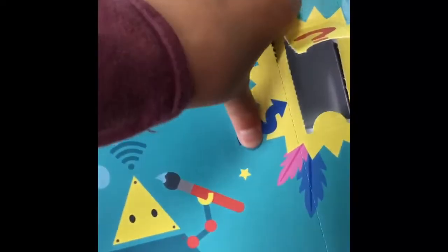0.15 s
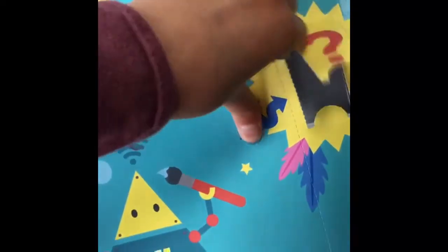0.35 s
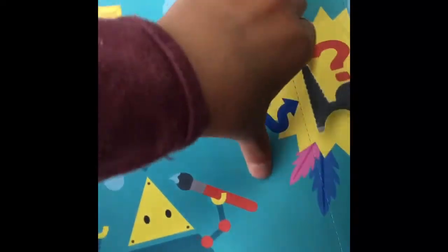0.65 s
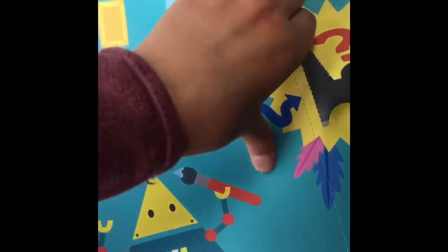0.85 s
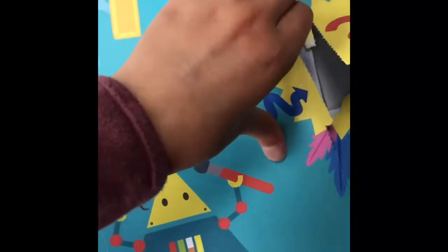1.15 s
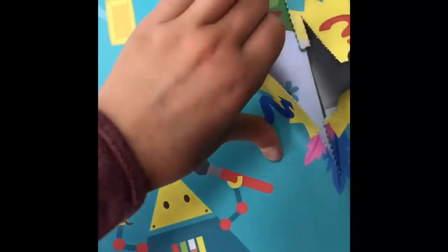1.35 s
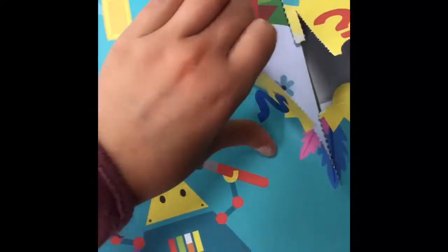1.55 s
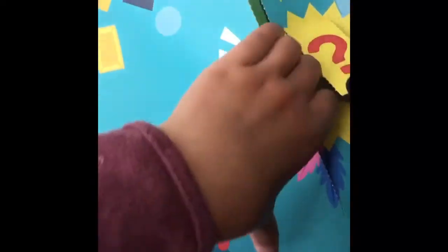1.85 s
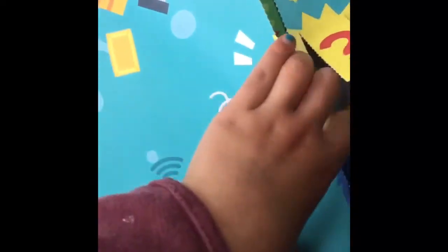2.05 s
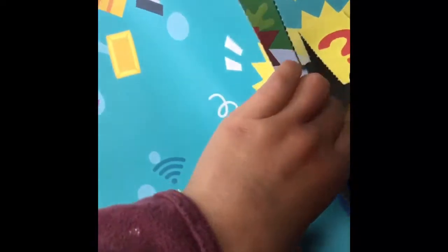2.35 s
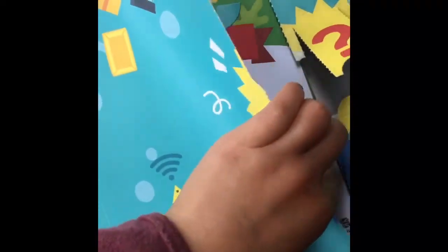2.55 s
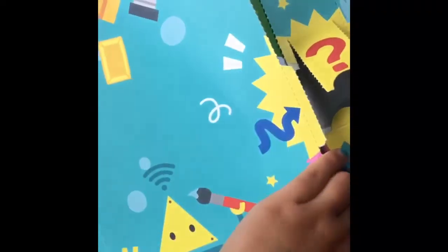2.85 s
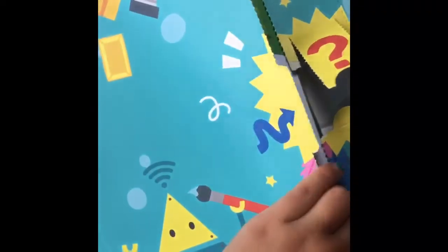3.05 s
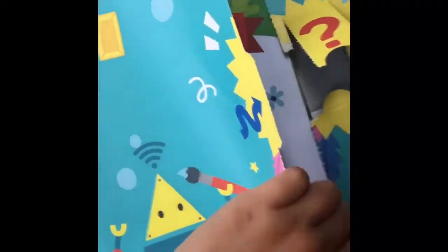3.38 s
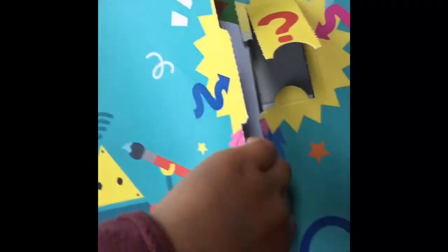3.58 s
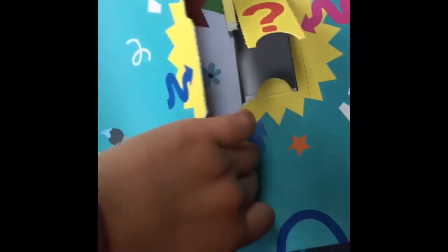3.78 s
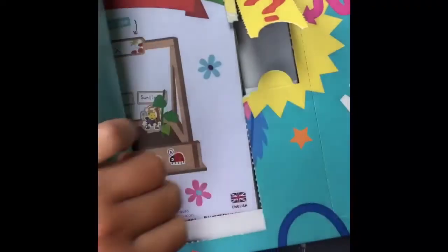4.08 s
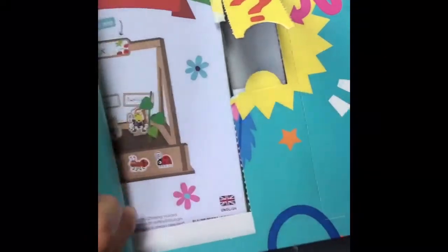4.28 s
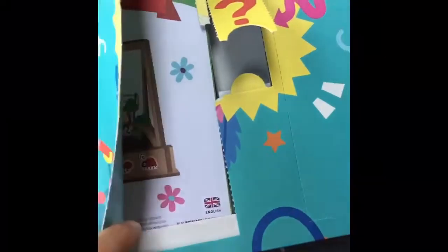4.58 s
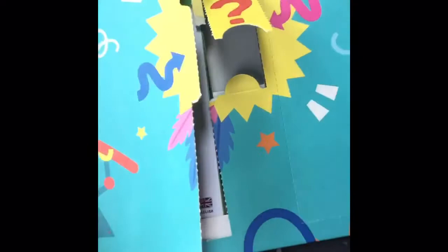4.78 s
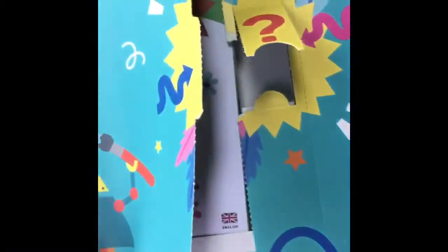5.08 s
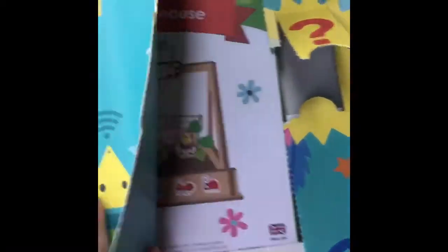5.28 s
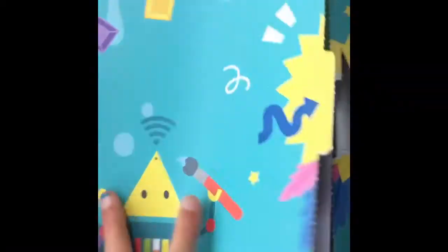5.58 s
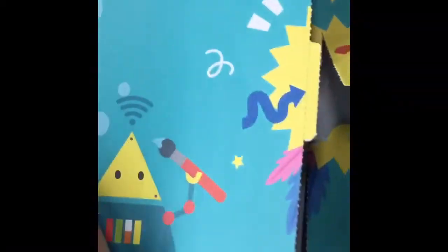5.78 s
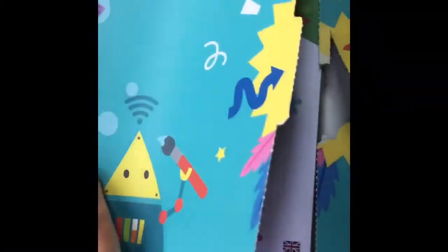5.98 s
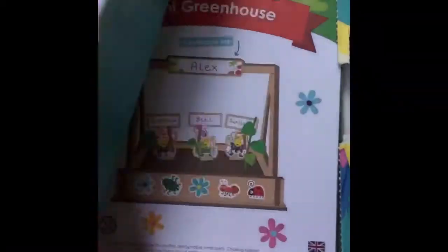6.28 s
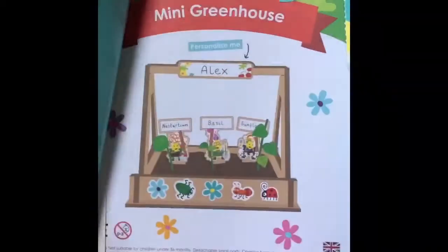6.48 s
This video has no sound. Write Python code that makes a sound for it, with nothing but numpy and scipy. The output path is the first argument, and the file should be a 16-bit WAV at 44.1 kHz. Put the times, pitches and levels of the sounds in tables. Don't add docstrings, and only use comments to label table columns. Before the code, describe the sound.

Very close, a hand tears the lid of a thin hollow cardboard box along its perforation. Sharp clusters of dry snaps and raspy fibre crackle come in uneven bursts, separated by near-silent gaps with faint finger rustling. Harder tugs add light boxy knocks. Later the pulls turn to scuffs and creases, ending with a dense crackle and soft flexing boom as the lid lifts. Small furnished room, short tail, thin phone microphone with little bass and a quiet background.

```python
import sys
import numpy as np
from scipy import signal
from scipy.io import wavfile
from scipy.ndimage import uniform_filter1d

SR = 44100
rng = np.random.default_rng(int(sys.argv[2]) if len(sys.argv) > 2 else 0)


def voltage_ratio(level):
    return 10 ** (np.asarray(level, float) / 20)


def digitize_waveform(pressure):
    field = np.atleast_2d(pressure).T
    bounded = np.clip(field, -1, 1)
    quanta = np.round(bounded * 32767).astype(np.int16)
    wavfile.write(sys.argv[1], SR, quanta)


N = 292383

# pitch_hz, width_hz, level_db
BOX_MODES = [
    (193, 76, -3),
    (282, 14, 2.5),
    (344, 57, -2.5),
    (481.6, 20, 2),
    (536, 25, 2),
    (670, 74, 1.5),
]


def rms_one(x):
    return x / np.sqrt(np.mean(x ** 2) + 1e-20)


def cut(x, hz, kind, order=2):
    sos = signal.butter(order, np.clip(hz, 20, .45 * SR), kind, fs=SR, output="sos")
    return signal.sosfilt(sos, x)


def resonate(x, hz, width_hz):
    r = np.exp(-np.pi * width_hz / SR)
    poles = [1, -2 * r * np.cos(2 * np.pi * hz / SR), r * r]
    return signal.lfilter([(1 - r * r) / 2, 0, (r * r - 1) / 2], poles, x)


def body(x, modes):
    return sum((-1) ** k * voltage_ratio(db) * resonate(x, hz, width_hz) for k, (hz, width_hz, db) in enumerate(modes))


def drift(rate_hz):
    r = np.exp(-2 * np.pi * rate_hz / SR)
    noise = rng.standard_normal(N + 9000)
    return rms_one(signal.lfilter([1], [1, -2 * r, r * r], noise)[9000:])


def snaps(strain_s=0.0021, strain_db=-26, after_s=0.0058, after_db=-17, rise=0.27, fall=0.48, spikiness=1.3,
          sharpness=7.3, broad_db=-13.0, crack_db=-6.5, ring_in_room=.3, broad_in_room_db=5):
    # start_s, peak_db,
    # flap_ring_hz, crack_re_peak_db, length_ms
    breaks = [(0.0546, -37.5, 3060, 5, 2.1), (0.0635, -8.5, 2664, 2, 2.2),
              (0.1688, -18, 3060, 5, 2.2), (0.2275, -29, 4010, 2, 2.5), (0.2352, 4.5, 1524, -6, 4.4),
              (0.259, 0, 2840, 2, 2.9), (0.2635, -3.5, 5340, -5, 1.6), (0.2712, -13.5, 3920, 10, 1.6),
              (0.2751, -19.5, 5870, -2, 1.2), (0.292, -10.5, 5440, 1, 1.1),
              (0.2982, -13.5, 5400, -6, 1.4), (0.4096, -12.5, 5430, -4, 2.5),
              (0.5726, -37.5, 1440, -18, 10), (0.6106, -34.5, 2000, 0, 12.0),
              (0.6491, -44, 1680, 8, 1.7), (0.6672, -37, 900, -14, 1.1),
              (0.7709, -49.5, 1350, -29, 2.1), (0.8961, -52.5, 4140, 8, 4.5),
              (0.9659, -10, 3680, 2.5, 4.4), (0.9884, -20, 2280, 6.5, 2.4), (0.994, -4, 5450, 1, 1.0),
              (0.998, -1.5, 3080, 9, 2.6), (1.0135, -1.5, 3760, 3.5, 0.8),
              (1.0314, -3.5, 3500, 1.5, 1.5), (1.1022, -30.5, 1360, -15, 2.4),
              (1.1256, -33, 3850, -4.5, 2.6), (1.2092, -36, 3460, 3, 1.1),
              (1.213, -5, 2820, 4.5, 2.3), (1.3102, -27.5, 1000, -23.5, 1.5),
              (1.3183, -7.5, 1230, -2, 0.79), (1.3241, -8.5, 1190, 10, 4.2),
              (1.349, -3.5, 6200, 7, 0.8), (1.4145, -28.5, 5430, 12.5, 1.5),
              (1.4735, -20, 2890, 11.5, 2.7), (1.4848, -30, 5940, 14, 1.4),
              (1.4934, -29.5, 5360, 10, 2.4), (1.5487, -18.5, 1980, -12, 2.2),
              (1.5555, -28, 2950, -2, 1.8), (1.5649, -10, 2700, -1.5, 3.5), (1.605, -34, 2240, 13, 1),
              (1.6947, -18, 6120, -7, 3.4), (1.7085, -14.5, 3440, 2.5, 3.5),
                    (1.7282, -22, 2030, -4, 2.3), (1.7376, 1.5, 1480, -15, 3.1),
                    (1.7515, -11, 1400, -20, 1.9), (1.7576, -20, 1340, -6, 2.1),
                    (1.9193, -31, 1230, -18, 2.3), (1.9663, -38, 4330, 2, 2.4),
                    (1.9946, -35, 1330, -18, 2.4), (2.0248, -31, 2430, -4.5, 5.5),
                    (2.0697, -30, 2370, 2, 3.1), (2.0818, -20, 3900, -9, 1.8), (2.089, -22, 1910, -9, 1.6),
                    (2.1015, -22, 1870, -9, 1.6), (2.1206, -21, 1940, -4, 1.8),
                    (2.149, -18.5, 1840, -8, 1.5), (2.176, -24.5, 1920, -8, 1.4),
                    (2.1985, -6, 2630, -1.5, 4.7), (2.2286, -14, 2480, 2.5, 2.9),
                    (2.2493, -9.5, 4600, 6.5, 3.7), (2.2573, 1.5, 1120, -8.5, 1.4),
                    (2.476, -27, 1850, -15.5, 1.6), (2.5076, 3.5, 2480, -9.5, 3.9),
                    (2.5173, 3, 2470, -11, 2.1), (2.5257, -13.5, 2450, -11, 1.1),
                    (2.5317, -17, 2200, -18, 0.89), (2.5818, -31, 2370, -4.5, 4.8),
                    (2.601, -28, 1940, -5, 1.4), (2.6717, -12.5, 1760, -18, 1.9),
                    (2.7648, -25, 1630, -14, 1.7), (2.886, -43, 1620, -43, 2.5),
                    (2.9313, -34.5, 1340, -28.5, 7.1), (2.947, -40, 1680, -14, 2.3),
                    (2.9766, -13.5, 1550, -4, 2.9), (2.9927, -24, 3490, 4, 5.0),
                    (3.033, -5.5, 1440, -9, 3.2), (3.0381, -4, 1420, -8.5, 2.6),
                    (3.0556, -0.5, 1480, -8.5, 0.84), (3.1592, -22, 1250, -24.5, 2.7),
                    (3.2963, 3, 3380, -8, 1.6),
              (3.3023, -1.5, 3500, -5, 2.6), (3.311, -6, 1490, -3, 2.4),
                    (3.3375, 0.5, 1540, -16.5, 2.45), (3.3574, -19, 1570, -18, 1.3),
                    (3.4696, -29, 905, -14, 2.4), (3.658, -33, 2130, -9, 3.4), (3.7489, -13, 2030, -9, 1.5),
                    (3.7807, 6, 2120, -5, 0.99), (3.7894, -25, 1810, -15, 0.74),
                    (3.8037, -1.5, 1600, -3.5, 2.9), (3.819, 0.5, 1530, -12.5, 2),
                    (3.8606, -3, 2080, -4, 1.8), (3.8819, -1, 1600, -3, 2.2), (3.895, -12, 1770, -14, 2.2),
                    (3.9182, -8.5, 1370, -8.5, 4.3), (4.0449, -7, 1390, -2.5, 3.9),
                    (4.0728, -20.5, 1380, -5, 1.2), (4.122, -9.5, 1570, -10.5, 3.6),
                    (4.1376, -26.5, 2260, -2.5, 1.3), (4.328, -14, 5300, 5.5, 2.8),
                    (4.4154, -22.5, 2130, -7, 2.3), (4.428, -22, 2400, -8, 6.1),
                    (4.5521, -17.5, 3340, -2, 18), (4.7174, -11.5, 3320, -1.5, 8.4),
                    (4.83, -35, 2110, -4, 5), (4.8845, -16.5, 2010, -44, 15),
                    (4.8941, -18.5, 1680, -7, 0.68), (5.0708, -46, 1530, -25, 1.9),
                    (5.0883, -31.5, 1530, -18.5, 2.2), (5.0991, -43, 1530, -12, 1.9),
                    (5.1118, -39.5, 1590, -10.5, 3.9), (5.1687, -9.5, 4370, 2.5, 5.3),
                    (5.1781, -28.5, 4500, 0, 2.8), (5.2083, -13.5, 4360, -2, 4.8),
                    (5.249, -8.5, 1900, -6.5, 2.3), (5.3038, -12.5, 3160, 0, 4.4),
                    (5.3185, -12, 3080, 0.5, 4.4), (5.377, -14, 3180, 3.5, 13),
                    (5.4053, -24, 3340, -5, 3.2), (5.4343, -2.5, 1680, -12.5, 2.6),
              (5.507, -27, 3510, -2.5, 2.7), (5.523, -18, 3440, -30, 1.5), (5.6462, -40, 1510, -9, 1.3),
                  (5.681, -31, 1350, -9, 3.2), (5.698, -31, 1360, -10, 1.8), (5.739, -31, 1550, 3, 12),
                  (5.9095, -12, 2630, -10, 6.3), (5.916, -19, 4400, -17, 1.6),
                  (5.958, -15.5, 2730, 5.5, 1.3), (5.9705, -10.5, 2620, 2.5, 5.8), (5.978, -20, 6000, 6, 2),
                  (5.9861, 1, 1520, 0, 2), (6.005, -8, 4300, -7, 1.5), (6.0248, -7.5, 4220, -0.5, 6),
                  (6.0513, -9.5, 3370, -1, 2.2), (6.065, -27, 3030, 1.5, 0.97),
                  (6.1138, -3.5, 4800, -1, 1.8), (6.1214, -4.5, 1190, -4, 2.5),
                  (6.1466, -14.5, 1670, -3, 8), (6.1693, -15.5, 1650, 2, 6), (6.1953, -15, 900, -8, 10),
                  (6.2111, -0.5, 1095, 0, 5.9), (6.3401, -24, 1000, -13, 2.2), (6.3725, -12, 5500, 2, 2.4),
                  (6.386, -12, 2360, 3, 4.4), (6.3922, -15, 1660, 4, 2), (6.4066, -6.5, 1750, 7, 3.3),
                  (6.4115, -8.5, 1680, 12, 0.5), (6.4265, -5.5, 2860, -2, 1.7),
                  (6.4336, -3.5, 3800, 3.5, 2.3), (6.4462, -10, 1740, 3, 2.1),
                  (6.5136, -13, 2000, -0.5, 1.9), (6.5344, -1.5, 2050, 0, 2),
                  (6.5477, -9.5, 2070, 3.5, 4.2), (6.5617, -9.5, 1670, 1, 10), (6.5725, -11, 2090, 3, 2.5),
                  (6.577, -10, 1740, 5, 4), (6.608, -16, 1140, 7, 0.9), (6.61, -18.5, 5920, 14, 0.84),
                  (6.6216, -29, 2930, 0, 2.8)]
    events = breaks
    lead = 500
    t = (np.arange(1700) - lead) / SR
    draws = rng.standard_normal((len(events), 2, len(t) + 1))
    near, around = np.zeros((2, N + len(t)))
    for (start_s, peak_db, hz, high_db, length_ms), (a, b) in zip(events, draws):
        strain = voltage_ratio(strain_db) * np.exp(-abs(t) / strain_s)
        after = voltage_ratio(after_db) * np.exp(-t / after_s)
        part = t / max(length_ms, .5) * 1000
        spike = np.exp(-abs(part / np.where(part < 0, rise, fall)) ** spikiness)
        shape = spike + np.where(t > 0, after, strain)
        burst = shape * a[1:]

        overtone_hz = hz * np.exp((0.23 + 0.56 * abs(a[0])) * np.sign(2700 - hz))
        overtone = voltage_ratio(-4.0 + 0.33 * high_db) * resonate(burst, overtone_hz, overtone_hz / sharpness)
        modes = resonate(burst, hz, hz / sharpness) + overtone
        broad = voltage_ratio(broad_db + 0.5 * max(high_db, -32)) * cut(burst, [950, 5500], "band")
        top_hz = max(7000 * voltage_ratio(0.5 * min(high_db + 11, 0)), 1.8 * hz)
        mixes = [modes + broad, ring_in_room * modes + voltage_ratio(broad_in_room_db) * broad]
        ring, blend = cut(mixes, [800, top_hz], "band")

        crack = cut(cut(shape ** 1.47 * b[1:], 4900, "high", order=3), 7600, "low", order=1)
        crack = voltage_ratio(peak_db + high_db + crack_db) * crack / abs(crack).max()
        ring_gain = voltage_ratio(peak_db - 1.5) / abs(ring).max()
        first = round(start_s * SR) - lead
        near[first:first + len(t)] += ring_gain * ring + crack
        around[first:first + len(t)] += ring_gain * blend + crack
    return near[:N], around[:N]


def thumps(damping=1.49, push_s=0.0035, scatter_db=4.5, peak_db=3.5):
    # start_s, level_db
    jolts = [(0.064, -35), (0.171, -43.5), (0.235, -17), (0.513, -47), (0.608, -40.5), (0.664, -43),
             (0.965, -33.5), (0.994, -28), (1.086, -45), (1.212, -29.5), (1.322, -26.5), (1.346, -31.5),
             (1.472, -38), (1.565, -40.5), (1.738, -29), (1.917, -48), (2.083, -45), (2.196, -28),
             (2.256, -20.5), (2.285, -48), (2.517, -21), (2.76, -41.5), (2.974, -37.5), (3.031, -24.5),
             (3.053, -29.5), (3.157, -46), (3.307, -26.5), (3.453, -45), (3.658, -48), (3.748, -29.5),
             (3.78, -24), (3.819, -23), (3.862, -26.5), (3.884, -25), (3.919, -29.5), (4.044, -28),
             (4.119, -32.5), (4.326, -30.5), (4.431, -43.5), (4.554, -42), (4.666, -47), (4.718, -29.5),
             (4.909, -48), (5.168, -29.5), (5.249, -36.5), (5.301, -33), (5.379, -36.5), (5.434, -44),
             (5.523, -44), (5.678, -43.5), (5.906, -45), (5.97, -35), (5.986, -24), (6.049, -35),
             (6.112, -27), (6.21, -26.5), (6.412, -26.5), (6.432, -27), (6.559, -29), (6.597, -39)]
    t = np.arange(6000) / SR
    out = np.zeros(N + len(t))
    draws = rng.standard_normal((len(jolts), len(t) + len(BOX_MODES)))
    for (start_s, db), draw in zip(jolts, draws):
        modes = [(hz, damping * width_hz, mode_db + scatter_db * z)
                 for (hz, width_hz, mode_db), z in zip(BOX_MODES, draw)]
        push = draw[len(BOX_MODES):] * t * np.exp(-t / push_s * 2)
        boom = cut(cut(body(push, modes), 1600, "low"), 170, "high", order=3)
        first = round(start_s * SR)
        out[first:first + len(t)] += voltage_ratio(db + peak_db) * boom / abs(boom).max()
    return out[:N]


def grains(per_s, spread_db, smooth):
    born = rng.random(N) < per_s * voltage_ratio(6.5 * drift(25)) / SR
    sizes = voltage_ratio(spread_db * np.minimum(rng.exponential(1, N), 4)) * rng.choice([-1, 1], N)
    rubbing = smooth * voltage_ratio(0.4 * drift(40)) * rng.standard_normal(N)
    return rms_one(rms_one(born * sizes) + rubbing)


def effort():
    # start_s, length_s, effort_db, sag_db over the pull, weight_db on all paths, most on sheet
    pulls = [(0, 0.018, -43, 17, -0.5), (.065, 0.16, -41.5, 5, -10), (.2, 0.18, -36, -6, -10),
             (.4, 0.12, -46, -3.5, -3), (.6, 0.1, -87.5, -11, 12), (.87, 0.084, -68, -4, 2),
             (.98, 0.21, -19, 27.5, -11), (1.216, 0.05, -23, 30, -7), (1.32, 0.14, -40.5, -6, -7),
             (1.54, 0.18, -46.5, -20.5, -3.5), (1.74, 0.11, -44, 22, 1), (1.888, 0.19, -53.5, 0, -0.5),
             (2.08, 0.056, -32, 19, -21), (2.2, 0.11, -30.5, 21, 0), (2.378, 0.04, -46.5, 7, -1.5),
             (2.468, 0.045, -52.5, -10, 0), (2.53, 0.25, -41, 12.5, 3.5), (2.65, 0.11, -40.5, -1, 2.5),
             (2.87, 0.038, -90, 6, 9.5), (2.95, 0.048, -59, -22, 0), (3.06, 0.16, -27.5, 35.5, -4.5),
             (3.31, 0.16, -42, -8, -0.5), (3.49, 0.23, -40.5, 7.5, 0), (3.75, .26, -46, -1, 0),
             (4.05, 0.32, -30.5, 28.5, -2.5)]
    lifts = [(4.32, 0.078, -32.5, 14, -3.5), (4.4, 0.068, -40.5, 1, -5), (4.53, 0.066, -30.5, 16, -3),
             (4.648, .05, -42, -5, -3), (4.7, 0.22, -37, 15.5, -1), (4.88, 0.13, -44.5, 10.5, 1),
             (5.04, 0.066, -88, -14.5, 12.5), (5.11, 0.039, -59, -13.5, 3), (5.18, 0.232, -28, -2.5, -3.5),
             (5.45, 0.094, -34.5, -4.5, -2), (5.58, 0.2, -45.5, -6, -2), (5.74, 0.31, -40, 3, -5),
             (5.95, 0.1, -28, -4.5, -7), (6.11, 0.12, -32.5, -15, -4.5), (6.25, 0.12, -32, 10, -2),
             (6.37, 0.083, -24, -6, 0.5), (6.52, 0.17, -23.5, -9.5, -1)]
    # level_db at mean effort, share of effort swing, share of weight, duck_db (ducked below)
    paths = [
        (-49.5, 0.54, 1, -92),
        (-48.5, 0.83, 0.56, -64),
        (-56.5, 0.86, 0.4, -91),
        (-55, 0.46, 0.97, -76),
    ]
    grip_db_per_s, let_go_db_per_s, mean_effort_db = 722.5, 463, -44
    mute_s, mute_width_s, mute_db = 0.826, 0.0097, -32.5
    duck_ratio = 0.57

    t = np.arange(0, N + 64, 64) / SR
    start_s, length_s, db, sag_db, weight_db = np.transpose(list(pulls) + list(lifts))[:, :, None]
    late_s = t - start_s
    pull_db = db - mean_effort_db - sag_db * np.clip(late_s / length_s, 0, 1)
    pull_db = pull_db + grip_db_per_s * np.minimum(late_s, 0)
    pull_db = pull_db - let_go_db_per_s * np.maximum(late_s - length_s, 0)
    muted_db = mute_db * np.exp(-((t - mute_s) / mute_width_s) ** 2)
    levels = []
    for path_db, swing, share, duck_db in paths:
        level_db = path_db + np.max(swing * pull_db + share * weight_db, axis=0)
        ducked_db = level_db + muted_db + duck_ratio * np.minimum(level_db - duck_db, 0)
        levels.append(np.interp(np.arange(N) / SR, t, ducked_db))
    return levels


def rustle(patchy_db=2.0, mode_db=8.5, sheet_swell_db=4):
    # pitch_hz, width_hz, level_db
    fibre_modes = [
        (1090, 220, -4),
        (1450, 74, 6),
        (1550, 300, -3.5),
        (2010, 67, 2),
    ]
    rub = grains(per_s=1400, spread_db=2.5, smooth=0.99)
    sheet = body(voltage_ratio(sheet_swell_db * drift(36.0)) * rub, fibre_modes) + voltage_ratio(-6.5) * rub
    sheet = cut(sheet, [850, 2600], "band", order=3)
    wandering = sum(voltage_ratio(-14.0 + mode_db * drift(2.6)) * resonate(rub, hz, 330) for hz in (3550, 4400, 5900))
    rasp = cut(rub + wandering, [2600, 6800], "band", order=4)
    hiss = cut(cut(rub, 5410, "high", order=4), 3200, "low", order=1)
    box = cut(body(rng.standard_normal(N), BOX_MODES), [125, 1100], "band")
    return sum(voltage_ratio(db + patchy_db * drift(10.0)) * rms_one(x)
               for db, x in zip(effort(), (sheet, rasp, hiss, box)))


def rubs(sharpness=6.3, smear=2.8):
    # mid_s, length_s, pitch_hz, level_db
    slides = [(0.089, 0.037, 5030, -48), (0.063, 0.013, 2930, -53), (0.64, 0.038, 2980, -59),
              (0.912, 0.038, 4040, -64), (0.954, 0.032, 3020, -49.5), (1.206, 0.002, 6000, -29),
              (1.49, .02, 6400, -48), (1.59, 0.031, 4000, -47), (1.7, 0.024, 2580, -49),
              (2.066, 0.034, 2350, -53.5), (2.46, 0.055, 3630, -51), (2.74, .04, 1200, -55),
              (3.564, 0.1, 5400, -52.5), (3.726, 0.022, 5000, -53), (4.301, 0.017, 5030, -47.5),
              (4.384, 0.091, 3440, -44.5), (4.535, 0.011, 3480, -39), (4.678, 0.013, 900, -51),
              (4.838, .02, 3200, -47), (4.912, 0.016, 1690, -42), (5.03, 0.043, 1510, -60.5),
              (5.456, 0.058, 3500, -41.5), (5.665, 0.039, 1440, -46), (5.673, 0.097, 5800, -55),
              (5.838, 0.036, 4400, -56), (6.132, 0.01, 1100, -33), (6.225, 0.021, 2300, -26),
              (0.261, 0.014, 3100, -23), (2.27, 0.025, 1110, -32), (3.755, 0.0089, 3560, -40),
              (6.363, .01, 5000, -47), (5.781, 0.011, 762, -50), (2.907, 0.032, 1600, -60),
              (1.998, 0.0072, 5800, -48), (1.943, .015, 6800, -62), (2.246, .002, 4000, -23),
              (4.898, 0.017, 2800, -42), (2.522, 0.011, 1090, -23.5), (2.332, .002, 12000, -59),
              (2.49, .003, 10000, -54), (5.157, 0.0025, 7000, -44), (6.209, 0.0023, 5000, -17)]
    t = np.arange(N) / SR
    rub = grains(per_s=5300, spread_db=0.0, smooth=0.87)
    out = np.zeros(N)
    for mid_s, length_s, hz, db in slides:
        width_hz = hz / sharpness + smear / length_s
        tone = rms_one(resonate(resonate(rub, hz, width_hz), hz, width_hz))
        out += voltage_ratio(db) * np.exp(-((t - mid_s) / length_s) ** 4) * tone
    return out


def flexing():
    # mid_s, pitch_hz, peak_db, length_s
    flexes = [
        (0.27, 200, -41, 0.04),
        (2.286, 222, -38.5, 0.036),
        (4.32, 136, -53, 0.015),
        (5.193, 260, -53, 0.041),
        (5.324, 265, -45.5, 0.059),
        (3.885, 282, -37.5, 0.056),
        (4.42, 178, -54.5, 0.076),
        (4.75, 170, -44.5, 0.024),
        (6.43, 197, -29, 0.042),
        (6.58, 240, -34.5, 0.059),
    ]
    t, out = np.arange(N) / SR, np.zeros(N)
    shake = rng.standard_normal(N)
    for mid_s, hz, db, length_s in flexes:
        swell = np.exp(-((t - mid_s) / length_s) ** 2)
        out += voltage_ratio(db) * swell * rms_one(resonate(resonate(shake, hz, 87), hz, 87))
    return out


def room(x):
    # pitch_hz, t60_s, tail_db
    tail_bands = [
        (272, 0.21, -21.5),
        (1165, 0.18, -16.5),
        (2520, 0.34, -20.5),
        (5430, 0.28, -18),
        (11900, 0.18, -12),
    ]
    t = np.arange(SR // 3) / SR
    onset = np.clip((t - .002) / 0.0017, 0, 1)
    tail = 0
    for hz, t60_s, db in tail_bands:
        band = cut(rng.standard_normal(len(t)), [hz / 1.72, hz * 1.35], "band")
        band = band * onset * voltage_ratio(-60 * t / t60_s)
        tail = tail + voltage_ratio(db) * band / np.sqrt(hz * t60_s)
    return signal.fftconvolve(x, tail)[:N]


def gate(x, gate_db=-92.5, ratio=1.5, from_hz=2500, top_hz=15980, top_gate_db=-66):
    hz, _, bins = signal.stft(x, SR, nperseg=512)
    hz = hz[:, None]
    power = uniform_filter1d(uniform_filter1d(abs(bins) ** 2, size=5, axis=-1), size=7, axis=-2)
    under_db = np.minimum(10 * np.log10(np.maximum(power, 1e-16)) - gate_db, 0)
    under_db = under_db * np.clip(hz / from_hz - 1, 0, .2) / .2
    top_under_db = 5 * np.minimum(10 * np.log10(power + 1e-16) - top_gate_db, 0)
    under_db = np.where(hz > top_hz, top_under_db, under_db)
    return signal.istft(bins * voltage_ratio(ratio * under_db), SR, nperseg=512)[1][..., :N]


def scene():
    near, around = snaps()
    thump = thumps()
    tail = voltage_ratio(10.0) * room(around + thump)
    return (near + thump + tail + rustle() + flexing() + rubs())[None]


def roll_off(x):
    return signal.sosfilt(signal.butter(12, 16960, fs=SR, output="sos"), x)


def record(dry):
    x = gate(.92 * np.tanh(dry / .92))
    x = cut(x, 83, "high")
    x = signal.sosfilt(signal.cheby2(10, 60, 16850, fs=SR, output="sos"), x)
    return roll_off(x)


dry = scene()
out = record(dry)
digitize_waveform(out)
```